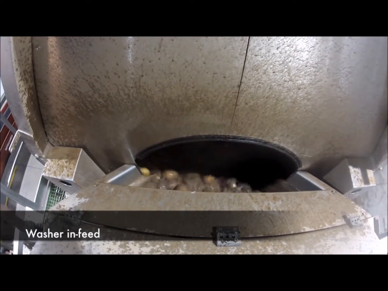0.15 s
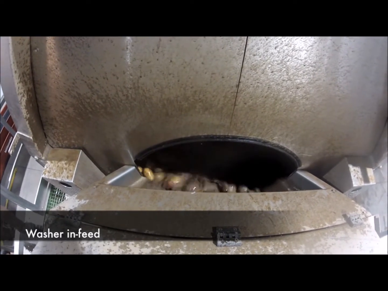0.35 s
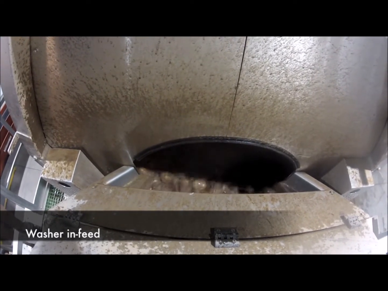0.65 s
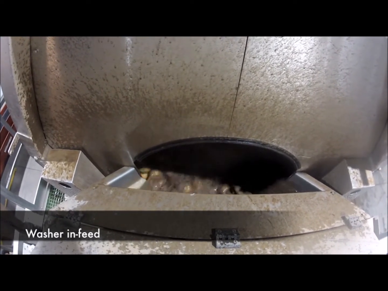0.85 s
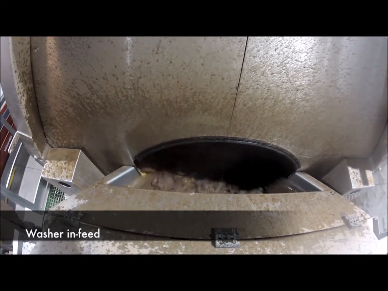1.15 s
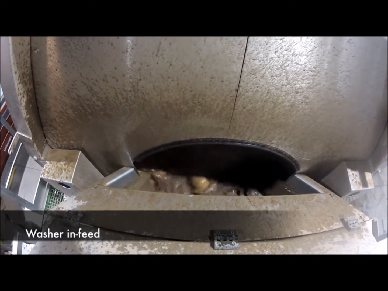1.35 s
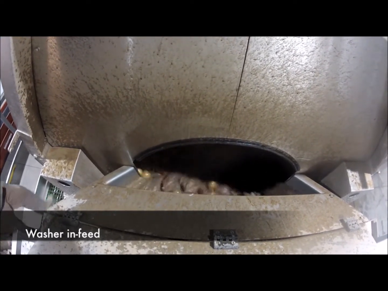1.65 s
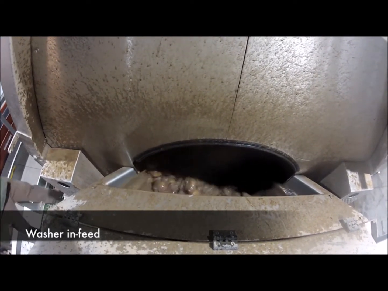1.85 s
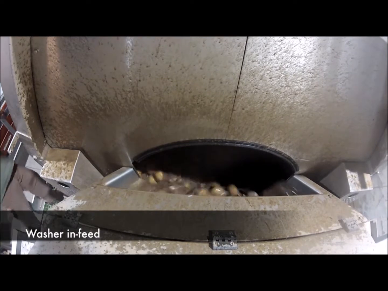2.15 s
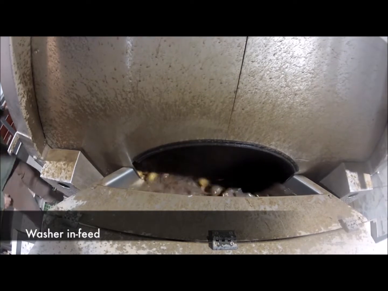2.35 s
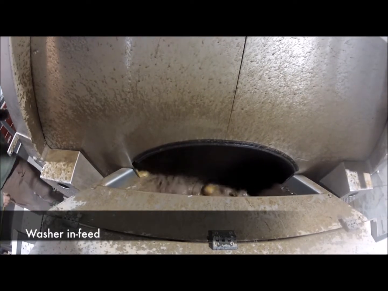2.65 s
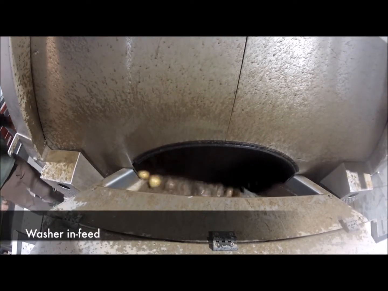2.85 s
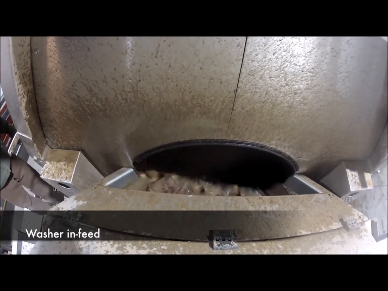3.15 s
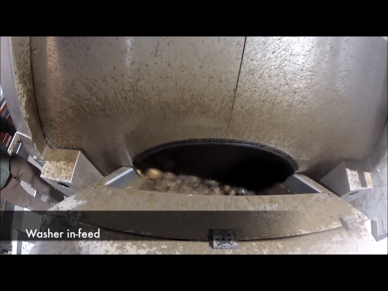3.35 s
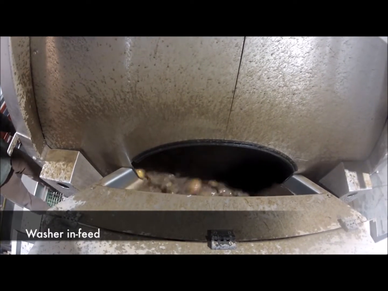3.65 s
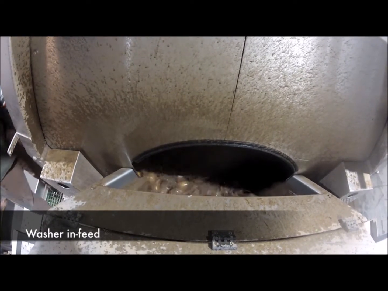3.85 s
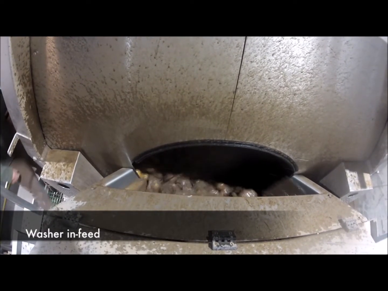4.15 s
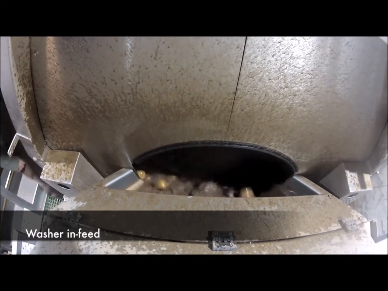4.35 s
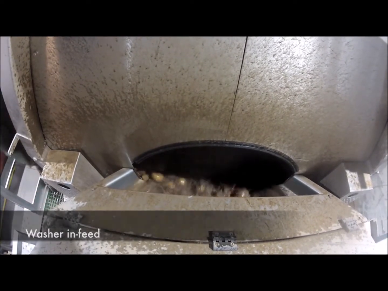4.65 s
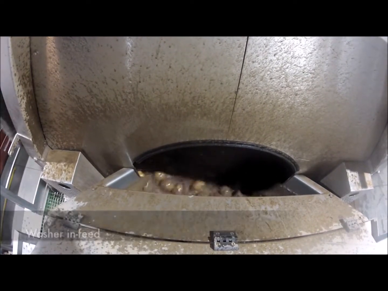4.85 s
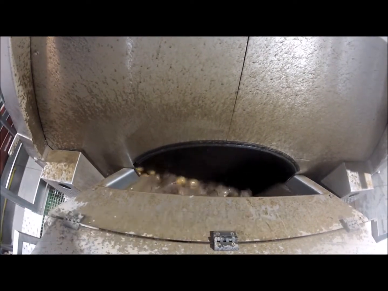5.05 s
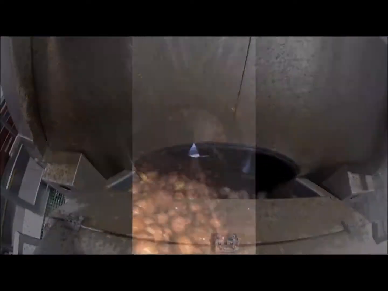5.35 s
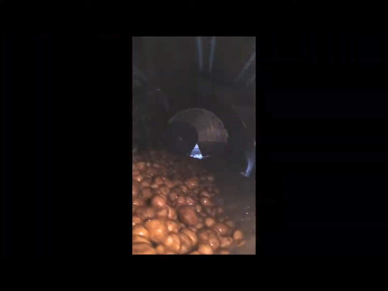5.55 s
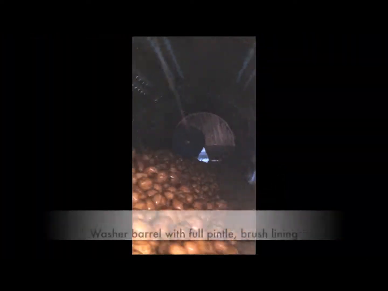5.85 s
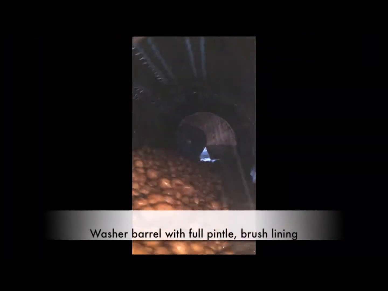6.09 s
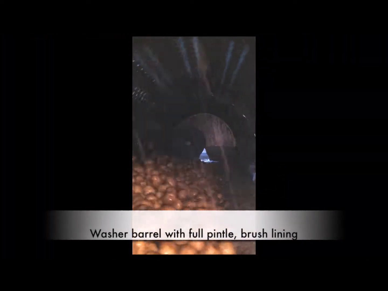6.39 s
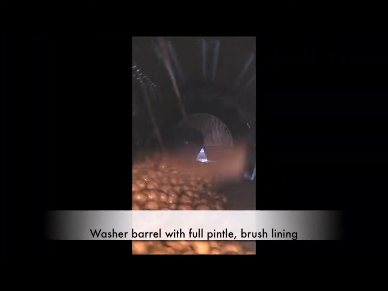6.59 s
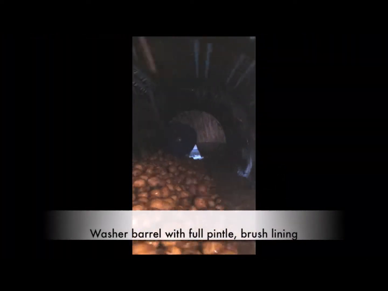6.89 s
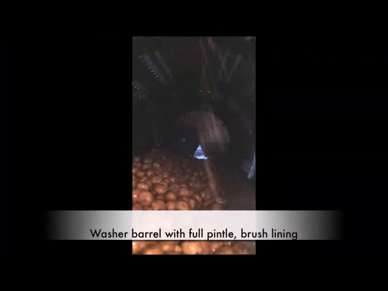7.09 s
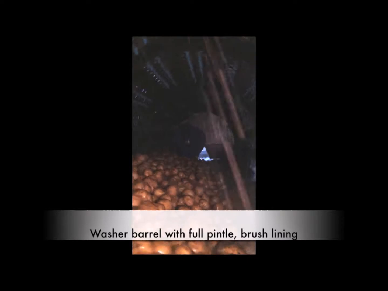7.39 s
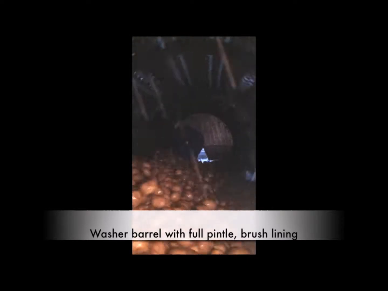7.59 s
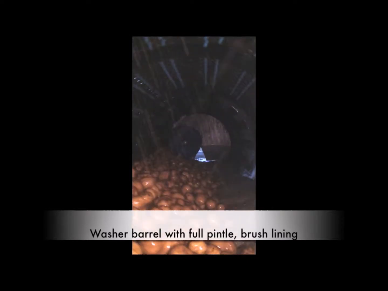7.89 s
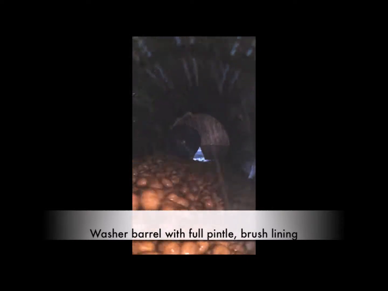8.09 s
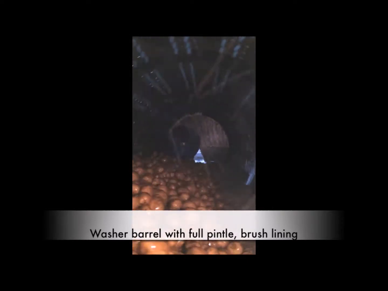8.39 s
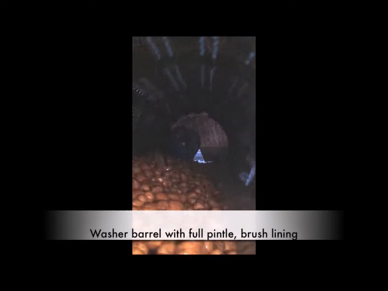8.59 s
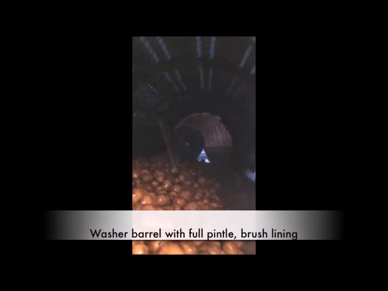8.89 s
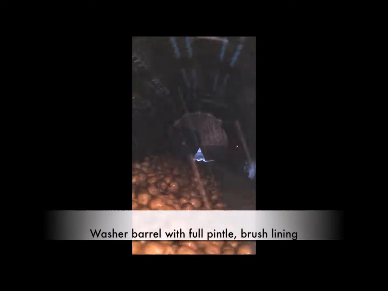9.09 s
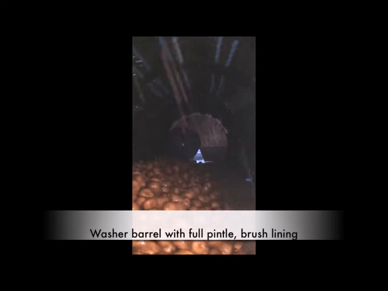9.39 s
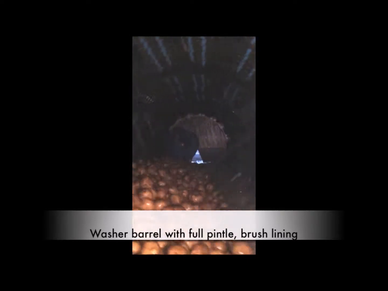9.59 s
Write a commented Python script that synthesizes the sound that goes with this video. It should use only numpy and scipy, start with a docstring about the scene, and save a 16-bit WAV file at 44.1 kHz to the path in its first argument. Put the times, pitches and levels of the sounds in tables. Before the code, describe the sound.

For the first five seconds, the in-feed of a potato washer runs steadily at a moderate level, heard through a small housed microphone that makes it boxy with a gritty treble. A dull, rattling roar surges gently over a low machinery rumble and a faint, thin motor whine. Short knocks and high drips dot the first three seconds, the clearest near 1.4 and 2.3 seconds, with others near 3.2 and 4.5 seconds.

From about 5.1 to 5.7 seconds this fades into the much louder inside of the turning barrel. The steel drum booms with deep, uneven throbs, swelling most near 7.2 and 8.3 seconds. Potatoes tumble over the brushes in a dense wash of soft knocks, with single thuds and short, deep bumps as the load falls back. Water jets hiss with a fine patter and occasional bright slaps. This continues until the end, near 9.7 seconds.

```python
"""At a potato washer, first by the in-feed, then inside the turning barrel. A small housed camera hears
the in-feed's dull roar and rumble, a few knocks and drips and a thin motor whine; it holds that sound in
coarse steps, which mirrors the roar into the treble. Then a fade to the barrel: the steel drum booms in
its low modes (the notes it rings at), potatoes thud over the brushes, water sprays and drips."""
import sys
import numpy as np
from scipy import signal
from scipy.io import wavfile
from scipy.ndimage import uniform_filter1d

SR = 44100
rng = np.random.default_rng(int(sys.argv[2]) if len(sys.argv) > 2 else 0)


def file_out(sig):
    """Save sig as 16-bit WAV at sys.argv[1]."""
    # one column per channel
    cols = np.atleast_2d(sig).T
    # limit, then scale
    lim = np.clip(cols, -1, 1)
    pcm = np.round(lim * 32767).astype(np.int16)
    wavfile.write(sys.argv[1], SR, pcm)


N = 429093
HOLD_HZ, STEPS = 12000, 4  # the camera's low sample rate; clock ticks it holds each sample for
FADE_START_S, FADE_S = 5.145, 0.6  # the barrel rises while the in-feed sinks

# How loud the barrel is over time: t/s, then level/dB of deep boom, upper boom, tumbling, spray
BARREL_LEVELS = [(5.2, -29, -11.5, -20, -30), (5.5, -17, -16, -23, -30.5), (5.9, -19, -16, -23, -32),
                 (6.15, -23, -17.5, -24.5, -31.5), (6.45, -15, -18, -22.5, -34),
                 (6.7, -24.5, -18, -25.5, -33.5), (6.95, -18.5, -15, -23.5, -32),
                 (7.15, -11, -17.5, -23.5, -33), (7.35, -22, -16.5, -25.5, -32.5),
                 (7.75, -18, -17, -24.5, -33.5), (8.05, -19.5, -16.5, -24, -34),
                 (8.3, -12.5, -21, -25.5, -33), (8.6, -22, -19.5, -25, -34), (8.85, -20, -18, -23, -32.5),
                 (9.15, -17.5, -15.5, -24.5, -32.5), (9.4, -21, -16, -24.5, -34.5),
                 (9.73, -20, -16.5, -23, -31.5)]

def barrel():
    """Inside the barrel: drum, potatoes and water sound together."""
    deep, upper, load, water = (gain * fade(N + 1, SR) for gain in along(BARREL_LEVELS, SR))
    out = drum_boom(deep, upper) + load * tumbling() + water * spray()
    out += thuds() + slumps() + splashes()
    entry = np.clip((np.arange(N + 1) / SR - 5.213) / .01, 0, 1)  # opens quickly, early in the fade
    return (out * entry)[:N]

# Tone of the drum's boom: f/Hz, relative level/dB
BOOM_TONE = [(12, -30), (24, -28), (38, -14), (46, -27), (56, -8), (90, -8.5), (120, -11.5), (153, -20.5),
             (175, -10), (205, -18), (240, -22.5), (400, -42)]
# Low notes of the drum: f/Hz, width/Hz, boost/dB
DRUM_MODES = [(68.8, 17.7, 10.5), (106.2, 11.8, 10), (138.5, 6.1, 10.5), (191, 8.8, 10)]

def drum_boom(deep, upper):
    """The steel drum booms; its deep and upper notes throb separately."""
    deep = deep * throb(N + 1, SR, depth_db=2)
    upper = upper * throb(N + 1, SR, depth_db=1.5)
    drum = noise(BOOM_TONE, DRUM_MODES, SR, size=8192, patchy_db=0, flicker_db=1)
    low = signal.sosfiltfilt(signal.butter(4, 90, fs=SR, output="sos"), drum)  # below 90 Hz
    return (deep * steadied(low, SR, span_s=0.072, share=0.25)
            + upper * steadied(drum - low, SR, span_s=0.055, share=0.33))

# The load falling back: t/s, peak level/dB, f/Hz
SLUMPS = [(6.212, -13, 67), (6.475, -6, 81), (6.615, -12, 81), (6.768, -13, 101), (7.63, -8, 99.2),
          (7.92, -14, 118), (8.102, -7, 78), (8.229, -11, 77.5), (8.613, -9, 91), (8.739, -12, 79),
          (9.271, -9, 89.5), (9.588, -4, 105.4)]

def slumps():
    """The load slumps onto the drum with short, deep bumps."""
    out = np.zeros(N + 1)
    for s, db, hz in SLUMPS:
        add(out, SR, s, db, blow(hz, SR, t60=0.17, crack=0, rise_s=.015, length_s=0.095))
    return out

# Tone of the tumbling load: f/Hz, relative level/dB
TUMBLE_TONE = [(130, -33), (220, -16), (362, -8.5), (411, -6.5), (646, -8), (946, -7.5), (1100, -9),
               (1370, -8.5), (1940, -13), (3500, -14), (4550, -21.5), (7700, -120)]
# Notes of the barrel's shell: f/Hz, width/Hz, boost/dB
SHELL_MODES = [(295, 14, 11), (323, 18, 9), (412, 20, 2), (542, 14, 2.5), (936, 62, 5.5)]

def tumbling():
    """Potatoes tumble in a wash of noise and many soft knocks, which ring the shell."""
    wash = noise(TUMBLE_TONE, SHELL_MODES, SR, size=2048, patchy_db=1.5, flicker_db=.6)
    pitches = np.geomspace(400, 3200, 20) * rng.uniform(0.92, 1.03, 20)
    taps = np.zeros(N + 1)
    for hz in pitches:
        hits = clicks(N + 1, SR, per_s=450 / len(pitches), spread_db=2.3)
        taps += signal.oaconvolve(hits, blow(hz, SR, t60=.035, crack=0.21))[:N + 1]
    taps = evened(filtered(taps, TUMBLE_TONE, SHELL_MODES, SR))
    return evened(wash + gain_of(-3.5) * taps)

# Potatoes landing: t/s, peak level/dB, f/Hz
LANDINGS = [(5.49, -16, 1150), (5.577, -17, 1364), (5.722, -24, 974), (5.9, -19, 1290), (5.925, -18, 995),
            (5.942, -20, 3560), (6.017, -19, 890), (6.046, -20, 2330), (6.075, -18, 1250),
            (6.182, -19, 1410), (6.276, -19, 1340), (6.717, -16, 970), (6.932, -15, 2390),
            (6.935, -18, 940), (6.998, -16, 910), (7.212, -17, 1200), (7.485, -17, 1430), (7.559, -21, 980),
            (7.612, -16.5, 936), (7.995, -14, 930), (8.055, -15.5, 1255), (8.064, -14.5, 3040),
            (8.439, -17.5, 956), (8.793, -14, 935), (8.83, -16, 1095), (8.876, -22, 910), (8.943, -15, 750),
            (9.312, -29, 995), (9.399, -21, 835), (9.406, -15, 2520), (9.59, -15, 1410)]

def thuds():
    """Single potatoes land, each a burst that is more noise than note."""
    out = np.zeros(N + 1)
    for s, db, hz in LANDINGS:
        hit = blow(hz, SR, t60=0.18, crack=5.9)
        add(out, SR, s, db, filtered(hit, TUMBLE_TONE, [(hz, 900, 7)], SR))
    return out

# Tone of the water: f/Hz, relative level/dB
SPRAY_TONE = [(1290, -34), (2200, -8.5), (2950, -15), (5030, -9), (8380, -8), (10300, -12.5), (14700, -15),
              (15300, -13)]

def spray():
    """Water jets hiss, with a fine patter of drops."""
    jets = noise(SPRAY_TONE, [], SR, size=512, patchy_db=1.1, flicker_db=1.1)
    drops = clicks(N + 1, SR, per_s=2000, spread_db=2.5)
    patter = evened(filtered(drops, SPRAY_TONE, [], SR))
    return evened(jets + gain_of(-12) * patter)

# Slaps of water: t/s, peak level/dB
WATER_SLAPS = [(5.6994, -24), (5.941, -23), (6.4981, -23), (6.934, -22), (7.1755, -25), (7.841, -23),
               (7.985, -23), (8.602, -24), (8.702, -25), (8.9051, -22), (9.505, -23)]

def splashes():
    """Water slaps in short, bright bursts."""
    out = np.zeros(N + 1)
    for s, db in WATER_SLAPS:
        slap = blow(3000, SR, t60=0.99, crack=3.4, rise_s=0.012)
        add(out, SR, s, db, filtered(slap, SPRAY_TONE, [(6460, 7700, 6.8)], SR))
    return out

# How loud the in-feed is over time: t/s, roar level/dB, rumble level/dB
FEED_LEVELS = [(0.0, -38, -35.5), (0.3, -37, -33), (0.9, -37.5, -34), (1.4, -37.5, -34.5), (1.85, -39, -35),
               (2.35, -36.5, -33), (3.0, -37, -33.5), (3.55, -39, -35), (3.75, -38, -33.5),
               (4.05, -39, -36), (4.2, -37.5, -32), (4.6, -38, -34.5), (5.2, -37, -33)]

def infeed():
    """The in-feed at the camera's low sample rate, sinking away in the fade."""
    roar, rumble = along(FEED_LEVELS, HOLD_HZ)
    length = len(roar)
    out = roar * feed_roar(length) + rumble * plant_rumble(length)
    out += motor_whine(length) + knocks_and_drips(length)
    return out * (1 - fade(length, HOLD_HZ))

# Tone of the in-feed's roar: f/Hz, relative level/dB
ROAR_TONE = [(300, -15.5), (500, -19.5), (800, -22.5), (975, -23.5), (1060, -21.5), (1450, -24),
             (2500, -24.5), (2820, -23), (3700, -18.5), (4500, -25), (5300, -20.5), (5700, -29.5),
             (6000, -34)]
# Notes of the camera's case: f/Hz, width/Hz, boost/dB
CASE_MODES = [(1117, 190, 9), (1908, 710, 17), (2640, 70, 2.5), (3173, 164, 9.5), (3630, 190, 3.5)]

def feed_roar(length):
    """Roar and rattle, heard through the case, surge as the load arrives in waves."""
    hiss = noise(ROAR_TONE, CASE_MODES, HOLD_HZ, size=512, patchy_db=.6, flicker_db=.5)
    taps = clicks(length, HOLD_HZ, per_s=600, spread_db=2.5)
    rattle = evened(filtered(taps, ROAR_TONE, CASE_MODES, HOLD_HZ))
    return evened(hiss + gain_of(-10) * rattle) * throb(length, HOLD_HZ, depth_db=.6, per_s=4)

# Knocks and high water drips at the in-feed: t/s, peak level/dB, f/Hz, amount of noisy crack
KNOCKS_AND_DRIPS = [(0.17, -33, 2000, 0.2), (0.231, -33, 3500, 0.2), (0.4165, -41, 3710, 0.2),
                    (0.854, -34, 3660, 0.2), (1.0755, -38, 3880, 0.2), (1.1388, -37, 3520, 0.2),
                    (1.381, -24.5, 2020, 0.7), (1.382, -32, 3220, 0.22), (2.0933, -31, 1900, 0.3),
                    (2.189, -35, 3220, 0.2), (2.2843, -27, 1900, 0.1), (2.3094, -28, 1900, 0.1),
                    (2.332, -28, 1880, 0.1), (2.5716, -31, 3500, 0.2), (2.8045, -35, 3570, 0.2),
                    (3.1872, -30, 1900, 0.3), (4.459, -26.5, 1900, 0.4)]

def knocks_and_drips(length):
    """Knocks and high water drips ring briefly, heard through the camera's case."""
    out = np.zeros(length)
    for s, db, hz, crack in KNOCKS_AND_DRIPS:
        hit = blow(hz, HOLD_HZ, t60=0.022, crack=crack, rise_s=0.0026)
        add(out, HOLD_HZ, s, db, filtered(hit, ROAR_TONE, CASE_MODES, HOLD_HZ))
    return out

# Tone of the machinery's rumble: f/Hz, relative level/dB
RUMBLE_TONE = [(15, -65), (25, -30), (52, -8), (87, -7), (125, -5.5), (150, -3), (194, -6), (218, -8.5),
               (257, -7.5), (379, -17.5), (412, -22), (570, -25.5), (700, -26), (910, -64), (1540, -120)]
# Notes of the hall and the frame: f/Hz, width/Hz, boost/dB
HALL_MODES = [(71.2, 11.4, 9), (102, 11.6, 12), (191.2, 13, 7.5), (384.5, 20, 6.5)]

def plant_rumble(length):
    """The machinery rumbles, and the hall and frame boom along."""
    rumble = noise(RUMBLE_TONE, HALL_MODES, HOLD_HZ, size=2048, patchy_db=1, flicker_db=-0.9)
    return throb(length, HOLD_HZ, depth_db=0.75) * steadied(rumble, HOLD_HZ, span_s=0.11, share=0.54)

# Motor tones: f/Hz, average level/dB
MOTOR_TONES = [(538.8, -60.5), (1077, -60), (4549.7, -73)]

def motor_whine(length):
    """The motor's thin tones waver with the load."""
    t = np.arange(length) / HOLD_HZ
    out = np.zeros(length)
    for hz, db in MOTOR_TONES:
        tone = np.sqrt(2) * gain_of(db) * np.sin(2 * np.pi * hz * t)
        out += tone * throb(length, HOLD_HZ, depth_db=2, per_s=4)
    return out

def held(x):
    """The camera holds each sample as a flat step, which mirrors the sound into the treble."""
    steps = np.repeat(x, STEPS)
    return signal.resample(steps, round(len(steps) * SR / (STEPS * HOLD_HZ)))[:N]

def gain_of(db):
    """Turns decibels into a factor."""
    return 10 ** (np.asarray(db) / 20)

def evened(x):
    """Scales to an average (rms) level of 1."""
    return x / np.sqrt(np.mean(x ** 2) + 1e-20)

def along(table, rate):
    """Turns each level column into a gain for every sample."""
    s, *columns = np.transpose(table)
    t = np.arange(int(N * rate / SR) + 1) / rate
    return [gain_of(np.interp(t, s, db)) for db in columns]

def colour(tone, modes, hz):
    """The level in dB at each frequency, boosted around each mode."""
    f, db = np.transpose(tone)
    boosts = sum(boost_db / (1 + (2 * (hz - at) / width) ** 2) for at, width, boost_db in modes)
    return np.interp(np.log(hz + 1), np.log(f + 1), db, left=-90, right=-90) + boosts

def noise(tone, modes, rate, size, patchy_db, flicker_db):
    """Shaped noise: patches of its tone drift, and its whole level flickers."""
    length = int(N * rate / SR) + 1
    frames, hz = 4 * length // size + 5, np.fft.rfftfreq(size, 1 / rate)
    real, imag, patches = rng.standard_normal((frames, len(hz), 3)).T
    patches = evened(uniform_filter1d(uniform_filter1d(patches, size=8, axis=0), size=8, axis=1))
    flicker = evened(uniform_filter1d(rng.standard_normal(frames), size=3))
    db = colour(tone, modes, hz)[:, None] + patchy_db * patches + flicker_db * flicker
    spectra = (real + 1j * imag) * gain_of(db)
    return evened(signal.istft(spectra, nperseg=size, noverlap=3 * size // 4)[1][:length])

def filtered(x, tone, modes, rate):
    """Gives a sound a tone, so that it rings only after each hit."""
    hz = abs(np.fft.fftfreq(4096, 1 / rate))
    log_gain = np.log(gain_of(colour(tone, modes, hz)))
    response = np.fft.ifft(np.exp(np.conj(signal.hilbert(log_gain)))).real[:2048]
    return signal.oaconvolve(x, response)[:len(x)]

def clicks(length, rate, per_s, spread_db):
    """Scattered clicks; a few are large."""
    size = gain_of(spread_db * np.minimum(rng.exponential(1, length), 5))
    sign = rng.choice([-1., 1.], length)
    return size * sign * (rng.random(length) < per_s / rate)

def blow(hz, rate, t60, crack, rise_s=0.0014, length_s=.05):
    """A note plus noise (crack), dying by 60 dB in t60 seconds and tapered to end at length_s."""
    t = np.arange(int(rate * length_s)) / rate
    ring = np.sin(2 * np.pi * hz * t) + crack * rng.standard_normal(len(t))
    ring = ring * gain_of(-60 * t / t60) * np.minimum(t / rise_s, 1) * np.cos(np.pi / 2 * t / t[-1])
    return ring / abs(ring).max()

def add(mix, rate, start_s, peak_db, sound):
    """Mixes a sound in at the given time and peak level."""
    part = mix[round(start_s * rate):][:len(sound)]
    part += gain_of(peak_db) * sound[:len(part)] / abs(sound).max()

def steadied(x, rate, span_s, share):
    """Takes a share of the chance swells out of a noise, as in a drum driven without pause."""
    power = uniform_filter1d(x ** 2, round(span_s * rate))
    return evened(x / (abs(power) + .02) ** (share / 2))

def throb(length, rate, depth_db, per_s=7.2):
    """A gain that swells and sinks unevenly, about per_s times a second."""
    t = np.arange(0, length / rate + .01, .005)
    speeds, phases = per_s + 1.5 * rng.standard_normal(24), rng.random(24)
    wave = evened(np.sin(2 * np.pi * (speeds * t[:, None] + phases)).sum(axis=1))
    return evened(gain_of(depth_db * np.interp(np.arange(length) / rate, t, wave)))

def fade(length, rate):
    """Goes from 0 (in-feed) to 1 (barrel)."""
    return np.clip((np.arange(length) / rate - FADE_START_S) / FADE_S, 0, 1)

def scene():
    """The in-feed, then the barrel."""
    return (held(infeed()) + barrel())[None]

def record(dry):
    """The input rounds off the tallest peaks; then treble above 15310 Hz is cut."""
    rounded = 1.1 * np.tanh(dry / 1.1)
    lowpass = signal.firwin(1023, 15310, window=("kaiser", 9), fs=SR)
    return signal.oaconvolve(rounded, lowpass[None], "same")

dry = scene()
out = record(dry)
file_out(out)
```